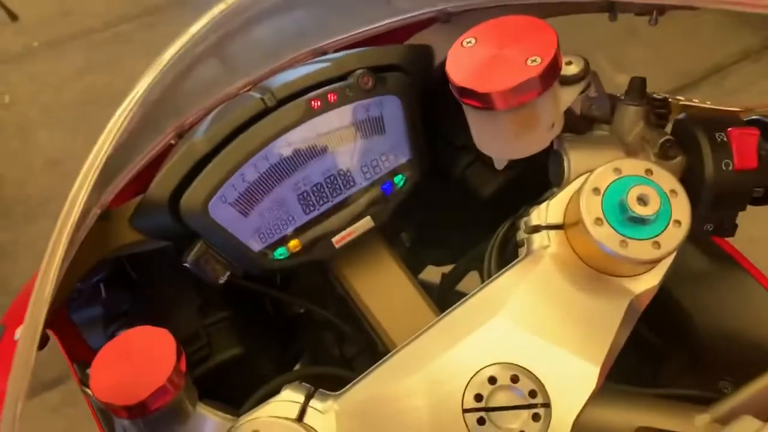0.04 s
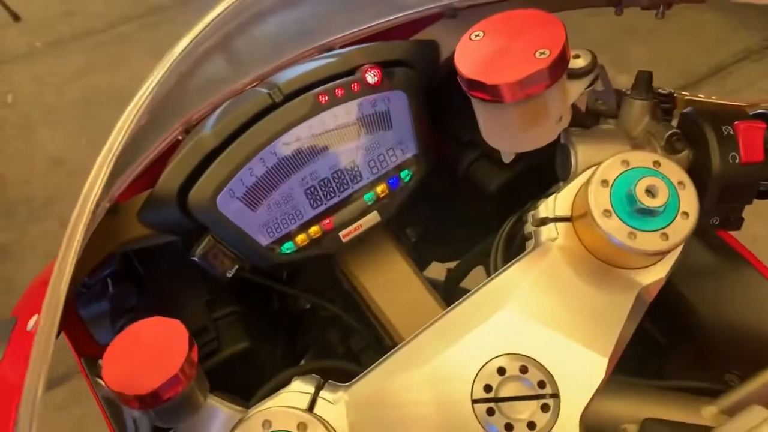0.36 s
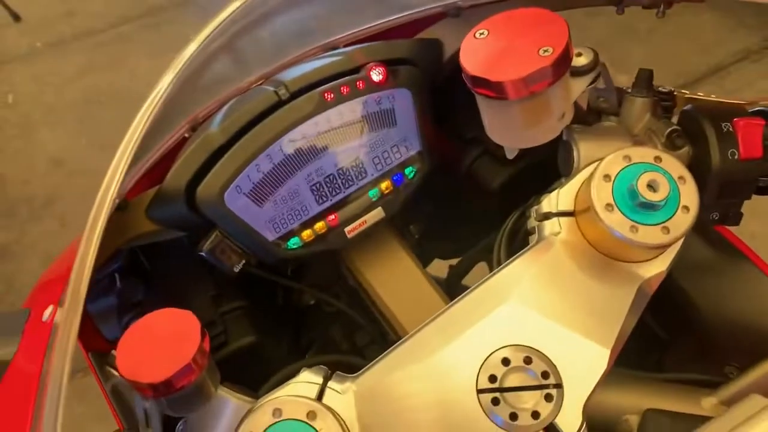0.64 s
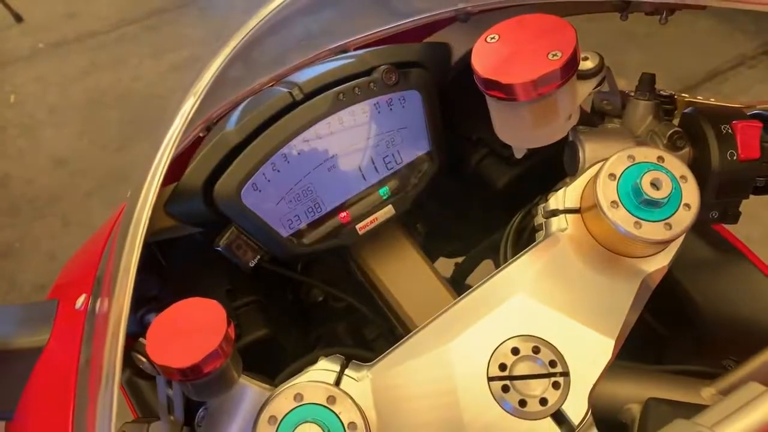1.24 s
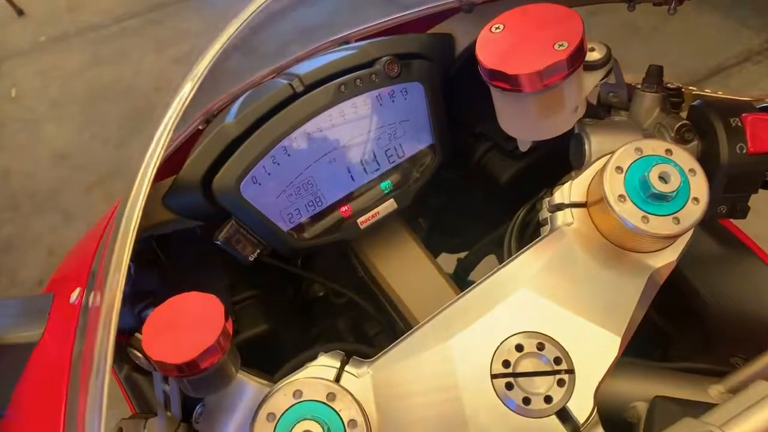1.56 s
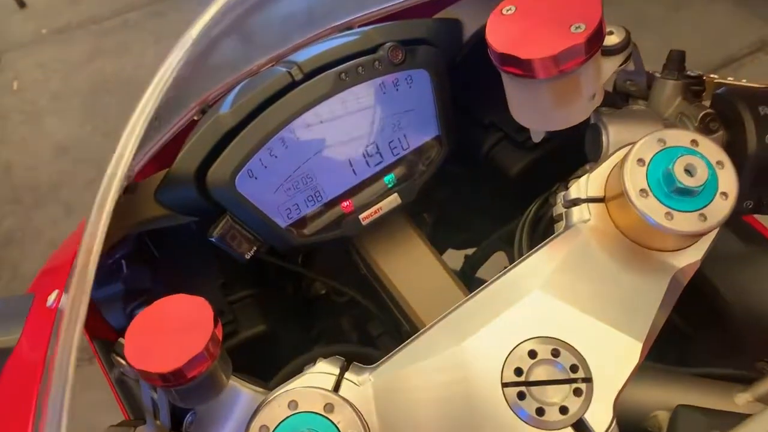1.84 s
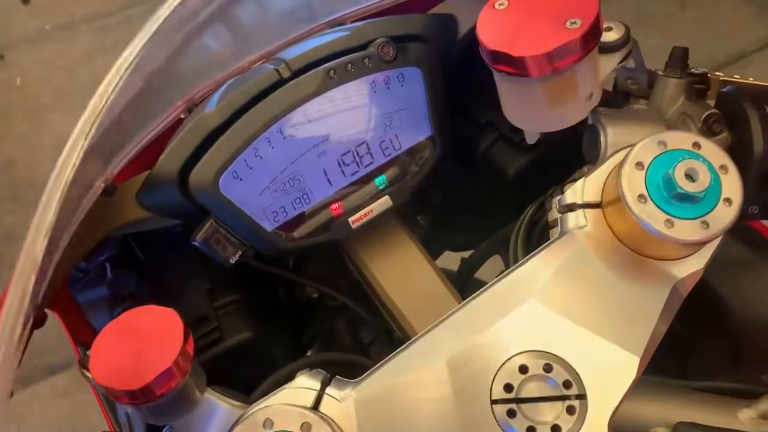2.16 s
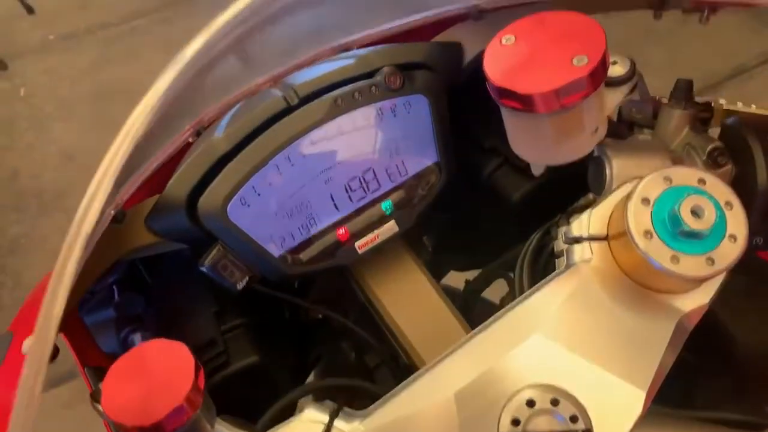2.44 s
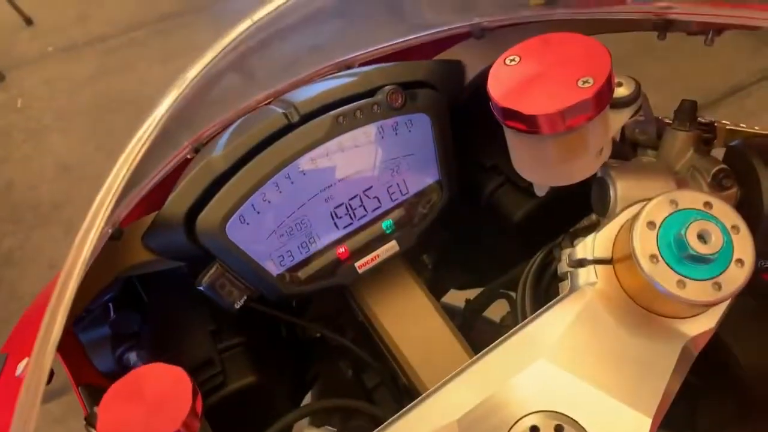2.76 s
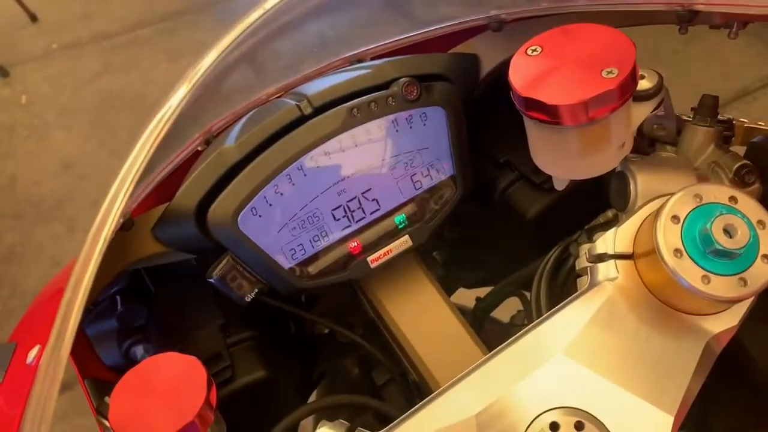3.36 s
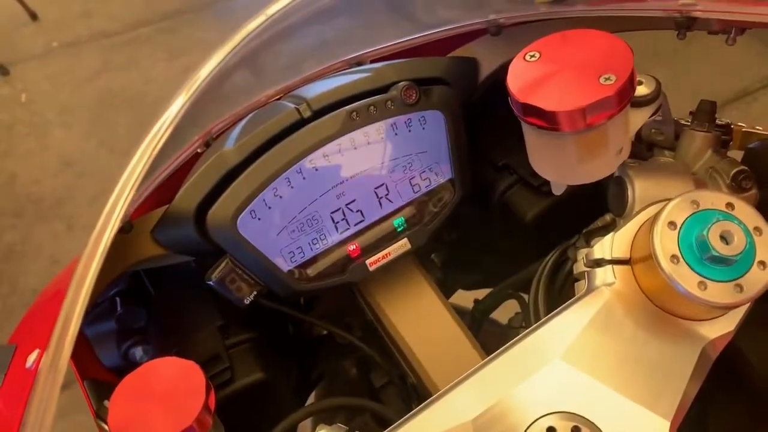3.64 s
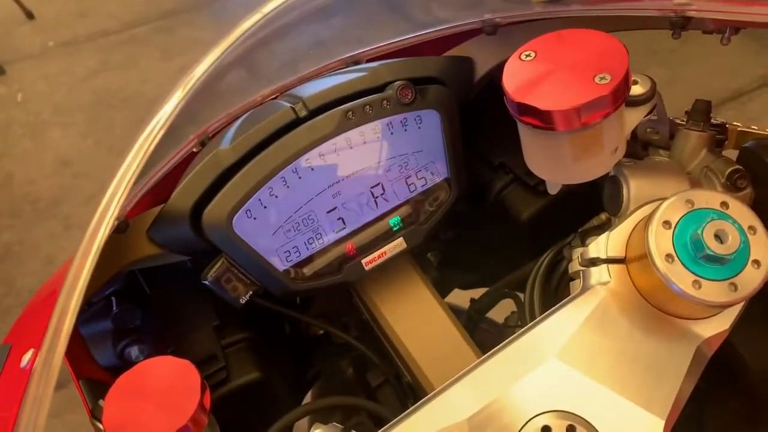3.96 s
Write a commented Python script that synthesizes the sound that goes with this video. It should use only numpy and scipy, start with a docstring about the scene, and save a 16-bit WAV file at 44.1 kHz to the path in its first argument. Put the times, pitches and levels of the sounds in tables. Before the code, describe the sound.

A motorcycle is started close by in a garage. Its fuel pump whirs faintly until a soft click at 0.7 seconds. A very faint distant chirp follows, then light cloth rustling and small ticks from 1.8, and a sharper switch click near 3.1. From 3.2 to 4 seconds the starter cranks loudly with gear whine, metallic clatter and deep intake booms; the engine fires three times and the starter briefly squeals.

```python
"""A garage, heard from above the handlebars as a big twin-cylinder motorcycle is started.
The fuel pump whirs until a relay drops; something chirps far off, cloth rustles, switches click.
From 3.2 s the starter gears grind against the compression; gears and valve train clatter.
The airbox booms at each intake stroke, the engine fires three times and the overrun starter squeals."""
import sys
import numpy as np
from scipy import signal
from scipy.io import wavfile

SR = 44100
rng = np.random.default_rng(int(sys.argv[2]) if len(sys.argv) > 2 else 0)


def master(y):
    """Save y as 16-bit WAV."""
    cut = np.clip(np.atleast_2d(y).T, -1, 1)
    pcm = np.round(cut * 32767)  # scale
    wavfile.write(sys.argv[1], SR, pcm.astype(np.int16))


N = 176400
TIME_S = np.arange(N) / SR
CRANK_S, GARAGE_T60_S = 3.208, 0.91

# starter gear mesh, slowed by each compression (time [s], frequency [Hz])
MESH_PITCH = [(3.21, 400), (3.245, 600), (3.262, 780), (3.282, 838), (3.305, 815), (3.322, 735),
              (3.35, 620), (3.41, 490), (3.51, 535), (3.545, 720), (3.566, 1055), (3.581, 885),
              (3.595, 735), (3.615, 645), (3.68, 600), (3.703, 520), (3.73, 880), (3.80, 700), (3.85, 545),
              (3.88, 800), (3.905, 885), (3.93, 775), (4.0, 560)]
# gear whine (time [s], level [dB])
WHINE_LEVEL = [(3.21, -36.5), (3.255, -29), (3.278, -19), (3.32, -19.5), (3.36, -31), (3.44, -32),
               (3.50, -27), (3.54, -32), (3.57, -16.5), (3.612, -18.5), (3.66, -33), (3.695, -25),
               (3.80, -34), (3.86, -27), (3.92, -23), (4.0, -30)]
# starter squeal (time [s], frequency [Hz], level [dB])
SQUEAL_TRACK = [(3.835, 3250, -73), (3.852, 3292, -33), (3.885, 3258, -34.5), (3.92, 3154, -45),
                (3.945, 3017, -38), (4.0, 2855, -39)]
# harmonics (multiple, gain [dB])
MESH_ORDERS = [(1, -0.5), (2, 4.5), (3, -16.5), (4, -30), (5, -17.5)]
SQUEAL_ORDERS = [(1, 5), (2, 5.5), (3, -6)]
# intake strokes (time [s], level [dB], airbox pitch [Hz], hold [s])
INTAKES = [(3.432, -8.5, 81.4, 0.039), (3.685, -12.5, 60.6, 0.057), (3.801, -8.5, 84.1, 0.033),
           (3.975, -4, 84.5, .05)]
# firings (time [s], level [dB], hold [s])
FIRINGS = [(3.538, -19.5, 0.012), (3.708, -17.5, 0.037), (3.879, -15.5, 0.01)]
# gear and valve-train clatter (time [s], case gain [dB], treble gain [dB])
CLATTER_GAINS = [(3.215, -24.5, -42.5), (3.259, -18.5, -34), (3.287, -19.5, -41.5), (3.399, -27.5, -38),
                 (3.431, -21, -33), (3.563, -20, -31.5), (3.583, -17, -37), (3.661, -22.5, -37),
                 (3.701, -20, -35.5), (3.717, -13.5, -30.5), (3.763, -21, -38.5), (3.837, -21.5, -33.5),
                 (3.857, -20, -31), (3.899, -15, -28.5), (3.981, -24.5, -33), (4.0, -18, -32.5)]
# upper-mid rattle (time [s], gain [dB])
RATTLE_GAIN = [(3.21, -25.5), (3.228, -38.5), (3.248, -34.5), (3.536, -33.5), (3.544, -25.5),
               (3.694, -35.5), (3.72, -26.5), (3.748, -35), (3.858, -30.5), (3.878, -27), (3.922, -29),
               (4.0, -25.5)]
# ringing steel parts (time [s], hold [s], frequency [Hz], level [dB])
STEEL_RINGS = [(3.336, 0.021, 1770, -23.5), (3.39, 0.015, 2104, -21.5), (3.429, 0.017, 1142, -30),
               (3.482, 0.052, 1077, -26.5), (3.714, 0.014, 371.3, -22.5), (3.719, 0.057, 2085, -23.5),
               (3.846, 0.025, 1080, -24), (3.902, .1, 2072, -28.5), (3.864, 0.097, 3304, -30),
               (3.868, 0.045, 3554, -31), (3.935, .06, 4336, -36)]
# resonances (frequency [Hz], width [Hz], gain [dB])
CASE_MODES = [(854, 28, -7), (922, 28, -2.5), (1082, 20, 0), (1157, 35, -0.5), (1288, 10.5, -2),
              (1310, 18, -29), (1428, 20, -1), (1588, 29, -2), (1642, 18, -3), (1750, 9.3, -9),
              (2085, 34, -3)]
CLOTH_MODES = [(904, 190, -1.5), (1950, 270, -2.5)]
# engine spectra (frequency [Hz], band gain [dB])
FIRING_SPECTRUM = [(40, -2), (80, 7), (130, -2.5), (170, -4.5), (225, 0.5), (300, -9), (380, -1),
                   (520, -7.5), (800, -8.5), (1500, -13.5), (4000, -21), (12000, -32.5)]
CASE_SPECTRUM = [(290, -57), (500, -7), (631, -4), (738, -11), (851, 3), (1610, 5), (1910, -3), (2140, -3),
                 (2220, -2.5), (3000, -18), (3900, -51), (6600, -120)]
RATTLE_SPECTRUM = [(1800, -10), (2600, -12), (3400, 14), (4300, -0.5), (5000, -4.5), (7000, -16)]
TREBLE_SPECTRUM = [(3500, -21), (5000, -2), (6500, -0.5), (8000, 3), (9800, 10), (11200, -5.5), (13500, 2),
                   (16000, -2)]
FRAME_SPECTRUM = [(30, -6), (60, -0.5), (130, -3.5), (220, 2.5), (330, 9), (520, 0), (900, -12)]
# relays and switches (time [s], gain [dB], hold [s], knock [dB], tick [dB], snap [dB])
CLICKS = [(0.688, -45, 0.0042, -8.5, -1, -3), (1.902, -54, 0.002, -4, -6.5, -42),
          (2.421, -43.5, 0.0085, 1.5, -14.5, -28), (2.994, -48.5, 0.0029, -26, 1, -13.5),
          (3.076, -28.5, 0.0049, -17, -21, -7), (3.198, -31, 0.004, -30, -21, -28)]
# relay ring (frequency [Hz], gain [dB])
RELAY_MODES = [(1450, -6), (5814, -6), (6900, -14), (9313, -8)]
# relay and switch spectra (frequency [Hz], band gain [dB])
KNOCK_SPECTRUM = [(150, -46), (330, -2.5), (450, 1), (750, -16), (1050, 2.5), (1600, -46), (4000, -36)]
TICK_SPECTRUM = [(500, -18), (1400, 16), (2500, -4.5), (4200, 2.5), (6000, 1.5), (12000, -33)]
SNAP_SPECTRUM = [(2500, -16), (5800, -13), (7500, -3), (9600, 3.5), (11500, -12), (13200, -14),
                 (16000, -26)]
SCUFF_SPECTRUM = [(500, -8), (1100, -13), (1550, 6), (2200, -9), (3500, -17), (7000, -37)]
SHIMMER_SPECTRUM = [(4500, -14), (5600, -6), (7500, -14), (9500, 4), (11500, -29)]
# steady pump tones (frequency [Hz], level [dB])
PUMP_TONES = [(335, -66.5), (829, -72.5), (1728, -78), (3811, -84)]
# pump whine as pressure builds (time [s], frequency [Hz], level [dB])
PUMP_WHINE = [(0, 770, -71), (.22, 766, -75), (.33, 785, -68), (.6, 786, -63), (.8, 809, -59.5)]
# cloth strokes (time [s], swell [s], T60 [s], body level [dB], hiss level [dB])
RUSTLES = [(1.78, 0.24, 1.5, -67.5, -68.5), (1.98, .15, 0.63, -60.5, -91), (2.191, 0.095, 1.8, -70.5, -82),
           (2.65, 0.072, 0.22, -63, -79), (2.73, 0.079, 0.89, -89, -71), (2.85, 0.061, 0.75, -70, -80)]
# distant chirp (time [s], frequency [Hz], level [dB])
CHIRP_TRACK = [(1.18, 2450, -82), (1.23, 2520, -77), (1.28, 2720, -77), (1.295, 3190, -70),
               (1.365, 3300, -68), (1.39, 3570, -68), (1.41, 4200, -82), (1.47, 4300, -73)]
# pump, cloth and garage spectra (frequency [Hz], band gain [dB])
PUMP_SPECTRUM = [(150, 8), (330, 0.5), (560, -12.5), (800, -2.5), (1200, -19), (1750, -6.5), (2600, -24.5),
                 (4000, -17), (6200, -26.5), (8000, -58), (14000, -45)]
CLOTH_SPECTRUM = [(1800, 0), (2400, 9.5), (3200, 2), (4100, 6), (6000, -5), (9500, -24), (13000, -25)]
RUMBLE_SPECTRUM = [(22, -10.5), (50, -2), (80, -9), (130, -11.5), (200, -16.5), (400, -24), (700, -29.5),
                   (1200, -31.5), (1600, -36)]
HISS_SPECTRUM = [(1500, 0), (2100, -2), (3000, -10), (4500, -17), (7000, -21), (11400, -21), (13800, -18),
                 (15000, -30)]
# stereo image (frequency [Hz], correlation, left minus right at lean 1 [dB])
STEREO = [(59.7, 0.97, -3), (165, 0.92, -3), (365, 0.85, -1), (680, 0.18, -4), (1390, 0.11, 9),
          (2680, 0.077, 10), (4800, 0.08, -1), (9500, 1, -0.5), (14000, 1, -0.5)]


def starter(jitter=0.00799, grind_db=-13, room_db=-6):
    """The gear bites, then its teeth whine roughly at the mesh rate and its multiples."""
    (mesh_hz,), (whine_db,) = curves(MESH_PITCH), curves(WHINE_LEVEL)
    phase = 2 * np.pi * np.cumsum(mesh_hz * (1 + jitter * drift(82.3))) / SR
    teeth = sum(from_db(db + 4.3 * drift(52)) * np.sin(order * phase) for order, db in MESH_ORDERS)
    grind = 1 + from_db(grind_db) * drift(110)
    whine = unit_rms(teeth * grind) * from_db(whine_db) * (TIME_S > CRANK_S)
    bite = from_db(-26) * envelope(CRANK_S, 0.0021, 0.0046, 0.034) * rough_tone(3700, 440)
    return (bite + whine + from_db(room_db) * reverb(whine)) * pan(2)


def intake(attack_s=0.0097, sag_db_per_s=70, pipe_hz=44):
    """Each gulp of air sets the airbox booming over a deeper ring of the pipes."""
    out = 0
    for start_s, db, box_hz, hold_s in INTAKES:
        age_s = np.maximum(TIME_S - start_s, 0)
        boom = envelope(start_s, attack_s, hold_s, 0.26) * from_db(-sag_db_per_s * age_s)
        box = boom * np.sin(2 * np.pi * box_hz * age_s)
        pipe = from_db(-8) * envelope(start_s, attack_s, 0, 0.56) * np.sin(2 * np.pi * pipe_hz * age_s)
        out -= from_db(db) * (box + pipe)
    return out * pan(-0.7)


def exhaust(attack_s=0.0091, t60_s=0.35):
    """Each firing is a rough bark that dies in the room."""
    level = sum(from_db(db) * envelope(start_s, attack_s, hold_s, t60_s)
                for start_s, db, hold_s in FIRINGS)
    return level * band_noise(FIRING_SPECTRUM, contacts(), lean=0.37)


def clatter(engage_s=0.0094, clump_hz=34.7):
    """Gears and valve train rattle the cases, shake the frame and ring steel parts."""
    (case_db, treble_db), (rattle_db,) = curves(CLATTER_GAINS), curves(RATTLE_GAIN)
    hits = contacts()
    modes = resonances(hits, CASE_MODES) * pan(2)
    case = from_db(case_db - 2.5) * (band_noise(CASE_SPECTRUM, contacts(), lean=1.04) + modes)
    ringing = steel_modes(hits)
    rattle = from_db(rattle_db + 0.5) * band_noise(RATTLE_SPECTRUM, ringing, lean=0.91)
    treble = from_db(treble_db - 0.5) * band_noise(TREBLE_SPECTRUM, ringing, lean=0.79)
    frame = from_db(-32.5 + 2.4 * drift(12)) * band_noise(FRAME_SPECTRUM)
    rings = sum(from_db(db) * envelope(start_s, 0.0075, hold_s, 0.16) * wavering_tone(hz, 21.1)
                for start_s, hold_s, hz, db in STEEL_RINGS)
    clumps = from_db(drift(clump_hz))
    engaged = np.clip((TIME_S - CRANK_S) / engage_s, 0, 1)
    return (clumps * (case + rattle + treble) + frame) * engaged + rings * pan(4.5)


def steel_modes(hits, count=110, low_hz=2305, high_hz=14440, width_hz=37, share=0.61):
    """Contacts excite many thin modes of small steel parts, loosely spaced in pitch."""
    age_s = TIME_S[:SR // 8]
    position = (np.arange(count) + rng.random(count)) / count
    hz = low_hz * (high_hz / low_hz) ** position
    spread_db = 4 * np.clip(rng.standard_normal(count), -2, 1)
    gains = from_db(spread_db) * rng.choice([-1, 1], count) * np.sqrt(hz)
    impulse = gains @ np.sin(2 * np.pi * hz[:, None] * age_s) * np.exp(-np.pi * width_hz * age_s)
    ringing = signal.fftconvolve(hits, impulse[None, None], axes=2)[..., :N]
    return np.sqrt(1 - share) * hits + np.sqrt(share) * unit_rms(ringing)


def starter_squeal(width_hz=80, room_db=-3):
    """The engine overruns the starter: a thin, unsteady, falling squeal with its echo."""
    hz, level_db = curves(SQUEAL_TRACK)
    partials = sum(from_db(db) * rough_tone(order * hz, width_hz) for order, db in SQUEAL_ORDERS)
    tone = from_db(level_db) * (TIME_S > SQUEAL_TRACK[0][0]) * partials
    return tone + from_db(room_db) * reverb(tone[0])


def switches():
    """Bursts of knock, tick and snap with a room tail; a soft scuff around the first."""
    parts = [band_noise(spectrum) for spectrum in (KNOCK_SPECTRUM, TICK_SPECTRUM, SNAP_SPECTRUM)]
    scuff = from_db(-54.5) * envelope(0.614, 0.017, 0.051, 0.33) * band_noise(SCUFF_SPECTRUM)
    clicks = 0
    for start_s, db, hold_s, *parts_db in CLICKS:
        burst = envelope(start_s, 0.00025, hold_s, 0.026)
        tail = from_db(-15) * envelope(start_s, 0.0081, hold_s, 0.2)
        noise = sum(gain * part for gain, part in zip(from_db(parts_db), parts))
        clicks += from_db(db) * (burst + tail) * noise
    return scuff + clicks


def switch_rings():
    """The dropped relay rings with a bright shimmer; the handlebar switch rings hollow."""
    relay_s, switch_s = CLICKS[0][0], CLICKS[4][0]
    modes = sum(from_db(db) * rough_tone(hz, 120) for hz, db in RELAY_MODES)
    shimmer = from_db(-12.5) * band_noise(SHIMMER_SPECTRUM)
    relay = from_db(-51) * envelope(relay_s, 0.0027, 0, 0.37) * (modes + shimmer)
    switch = from_db(-45) * envelope(switch_s, 0.027, 0, 0.18) * rough_tone(643, 54)
    return relay + switch


def fuel_pump(stop_s=0.736, t60_s=0.43, width_hz=4.8):
    """The pump whirs as it primes; its whine swells with the pressure, then all dies away."""
    whine_hz, whine_db = curves(PUMP_WHINE)
    whir = from_db(-56.5) * band_noise(PUMP_SPECTRUM)
    tones = sum(from_db(db) * wavering_tone(hz, width_hz) for hz, db in PUMP_TONES)
    whine = from_db(whine_db) * wavering_tone(whine_hz, width_hz)
    return (whir + tones + whine) * from_db(-60 * np.maximum(TIME_S - stop_s, 0) / t60_s)


def cloth(flutter_db=1.5):
    """Cloth brushes near the handlebars: swelling strokes of hollow body and fine hiss."""
    grains = contacts()
    body, hiss = resonances(grains, CLOTH_MODES), band_noise(CLOTH_SPECTRUM, grains)
    out = 0
    for start_s, swell_s, t60_s, body_db, hiss_db in RUSTLES:
        ramp = np.clip((TIME_S - start_s) / swell_s, 0, 1)
        stroke = ramp * envelope(start_s, swell_s, swell_s, t60_s)
        out += stroke * (from_db(body_db) * body + from_db(hiss_db) * hiss)
    return out * from_db(flutter_db * drift(20))


def distant_chirp(width_hz=170, room_db=5.5):
    """A faint rising chirp, smeared by the garage's echo."""
    hz, db = curves(CHIRP_TRACK)
    gate = (TIME_S > CHIRP_TRACK[0][0]) & (TIME_S < CHIRP_TRACK[-1][0])
    call = from_db(db) * gate * rough_tone(hz, width_hz)
    return call + from_db(room_db) * reverb(call[0])


def room_tone():
    """Low rumble and faint hiss of the garage."""
    return from_db(-52.5) * band_noise(RUMBLE_SPECTRUM) + from_db(-74) * band_noise(HISS_SPECTRUM)


def reverb(x):
    """Garage echo: eight feedback delays a side, as loud as the input."""
    out = np.zeros((2, N))
    for k, lag in enumerate((rng.uniform(0.006, 0.045, 16) * SR).astype(int)):
        loop, gain = x.copy(), from_db(-60 * lag / SR / GARAGE_T60_S)
        for i in range(lag, N, lag):
            loop[i:i + lag] += gain * loop[i - lag:i][:N - i]
        out[k % 2] += (loop - x) * (-1) ** (k // 2)
    return unit_rms(out) * np.std(x)


def contacts(rate_hz=1800, spread_db=5, share=0.49):
    """2 x 2 streams of dense random impacts, blurred with noise."""
    shape = (2, 2, N)
    sizes = from_db(spread_db * np.minimum(rng.exponential(1, shape), 4)) * rng.choice([-1, 1], shape)
    impacts = unit_rms(sizes * (rng.random(shape) < rate_hz / SR))
    return np.sqrt(share) * impacts + np.sqrt(1 - share) * rng.standard_normal(shape)


def band_noise(spectrum, drive=None, lean=0.0):
    """Noise or drive shaped in third octaves; stereo, rms 1. Lean tilts it to the engine's side."""
    drive = rng.standard_normal((2, 2, N)) if drive is None else drive
    edges_hz, sides = 20 * 2 ** (np.arange(30) / 3), np.array([[1], [-1]])
    out = 0
    for k, (low_hz, high_hz) in enumerate(zip(edges_hz, edges_hz[1:])):
        if high_hz < spectrum[0][0] or low_hz > spectrum[-1][0]:
            continue
        band = signal.butter(2, [low_hz, high_hz], "band", fs=SR, output="sos")
        mid, side = signal.sosfilt(band, drive[k % 2])
        hz = np.sqrt(low_hz * high_hz)
        correlation = np.clip(at_hz(STEREO, hz), -0.99, 0.99)
        gain = from_db(at_hz(spectrum, hz)) * pan(lean * at_hz(STEREO, hz, column=2) / 2)
        out += gain * (np.sqrt(1 + correlation) * mid + np.sqrt(1 - correlation) * side * sides)
    return unit_rms(out)


def resonances(drive, modes):
    """Parallel two-pole resonators; stereo, rms 1."""
    out = 0
    for k, (hz, width_hz, db) in enumerate(modes):
        r = np.exp(-np.pi * width_hz / SR)
        b = np.array([1, 0, -1]) * (1 - r * r) / 2
        a = [1, -2 * r * np.cos(2 * np.pi * hz / SR), r * r]
        out += from_db(db) * signal.lfilter(b, a, drive[k % 2])
    return unit_rms(out)


def wavering_tone(hz, width_hz):
    """A tone wavering in pitch and level; stereo, rms 1."""
    phase = 2 * np.pi * np.cumsum(hz + width_hz / 2 * drift(width_hz)) / SR
    pair = [(1 + 0.36 * drift(width_hz)) * np.sin(phase + 0.6 * drift(width_hz)) for _ in range(2)]
    return unit_rms(np.array(pair))


def rough_tone(hz, width_hz):
    """Narrow-band noise around a pitch; stereo, rms 1."""
    carrier = np.exp(2j * np.pi * np.cumsum(hz * np.ones(N)) / SR)
    return np.array([(carrier * (drift(width_hz) + 1j * drift(width_hz))).real for _ in range(2)])


def drift(rate_hz, step=40):
    """Slow random wander, rms 1."""
    r = np.exp(-2 * np.pi * rate_hz * step / SR)
    slow = signal.lfilter([1], [1, -2 * r, r * r], rng.standard_normal(N // step + 2002))[2000:]
    return np.interp(np.arange(N) / step, np.arange(len(slow)), unit_rms(slow))


def envelope(start_s, attack_s, hold_s, t60_s):
    """Linear attack; exponential decay from hold_s after the start."""
    age_s = TIME_S - start_s
    return np.clip(age_s / attack_s, 0, 1) * from_db(-60 * np.maximum(age_s - hold_s, 0) / t60_s)


def curves(rows):
    """Columns of a time table, per sample."""
    times_s, *columns = np.transpose(rows)
    return [np.interp(TIME_S, times_s, column) for column in columns]


def at_hz(rows, hz, column=1):
    """Table lookup on a log-frequency axis."""
    table = np.array(rows)
    return np.interp(np.log(hz), np.log(table[:, 0]), table[:, column])


def delay_left(x, lag_s=0.000227):
    """Sound from the right reaches the left channel later."""
    return np.array([np.pad(x[0], (round(lag_s * SR), 0))[:N], x[1]])


def pan(db):
    """Stereo gains: left +db, right -db."""
    return from_db([[db], [-db]])


def from_db(db):
    """Decibels to gain."""
    return 10 ** (np.asarray(db) / 20)


def unit_rms(x):
    """Scale to rms 1."""
    return x / np.sqrt(np.mean(x ** 2) + 1e-20)


def scene():
    """The motorcycle over the garage's room tone."""
    undelayed = room_tone() + fuel_pump() + distant_chirp() + cloth() + switch_rings()
    undelayed += starter() + starter_squeal()
    return undelayed + delay_left(switches() + clatter() + intake() + exhaust())


def record(dry, cutoff_hz=15000):
    """Clip at full scale, then low-pass steeply."""
    lowpass = signal.ellip(10, 0.2, 80, cutoff_hz, fs=SR, output="sos")
    return signal.sosfilt(lowpass, np.clip(dry, -1, 1))


dry = scene()
out = record(dry)
master(out)
```